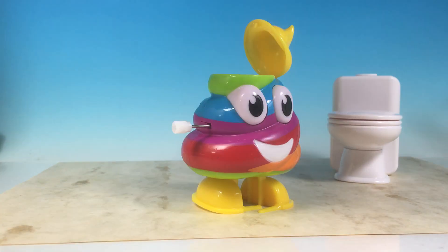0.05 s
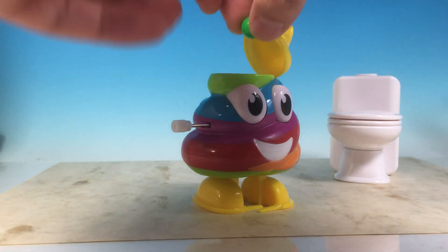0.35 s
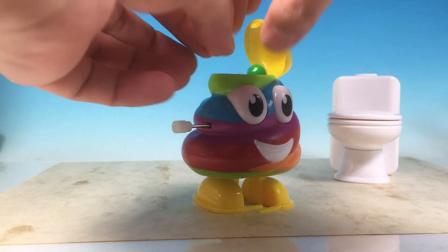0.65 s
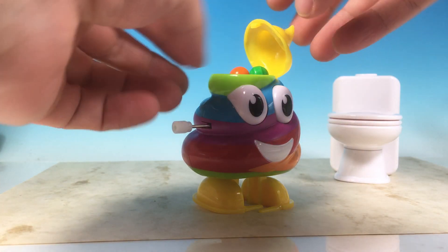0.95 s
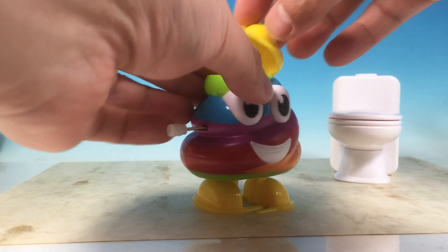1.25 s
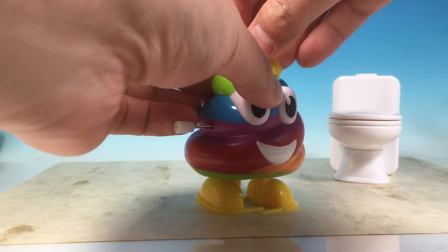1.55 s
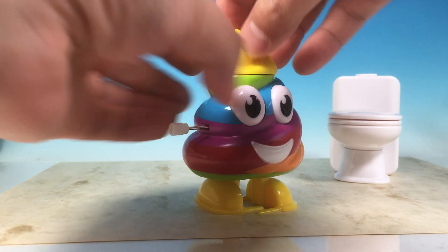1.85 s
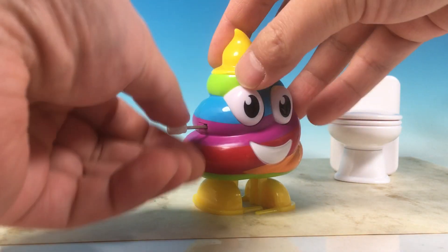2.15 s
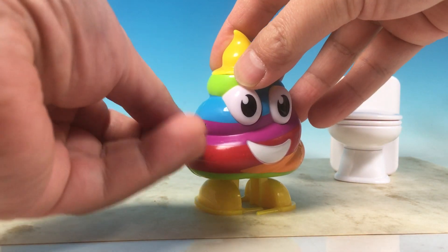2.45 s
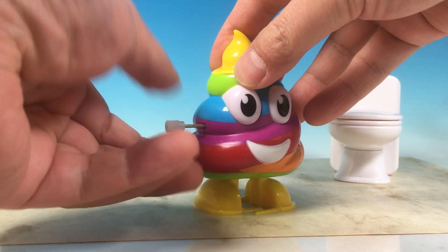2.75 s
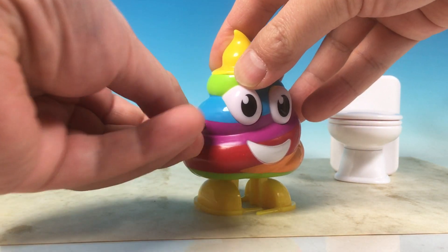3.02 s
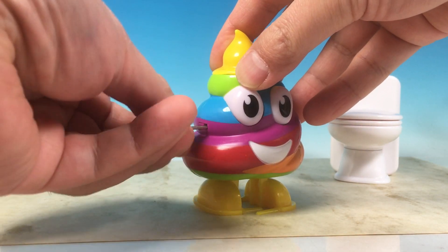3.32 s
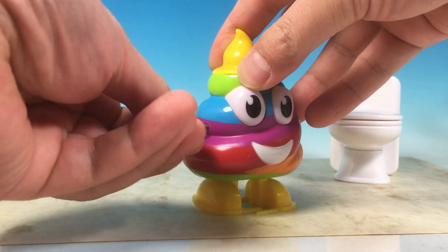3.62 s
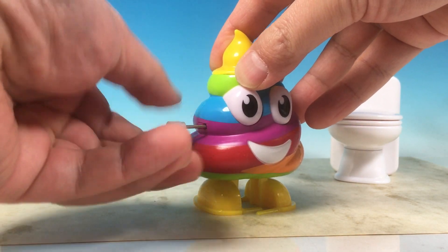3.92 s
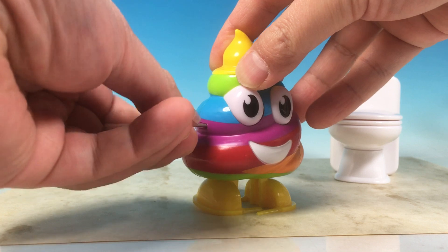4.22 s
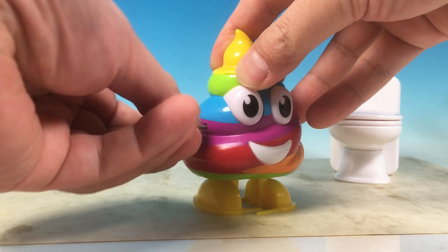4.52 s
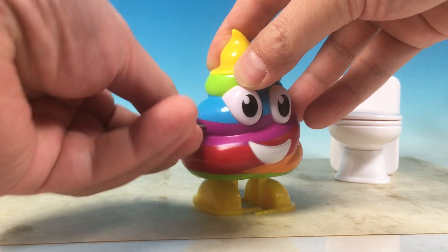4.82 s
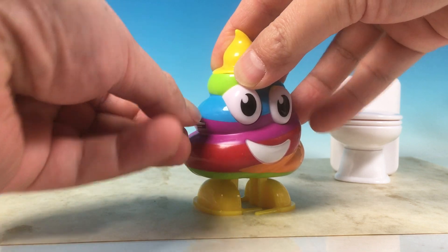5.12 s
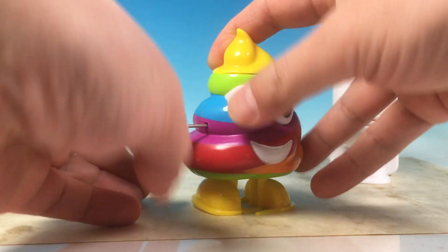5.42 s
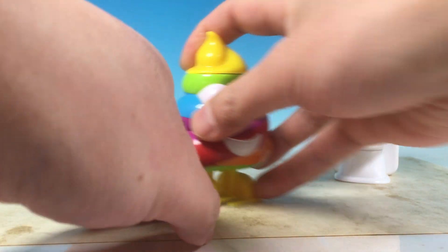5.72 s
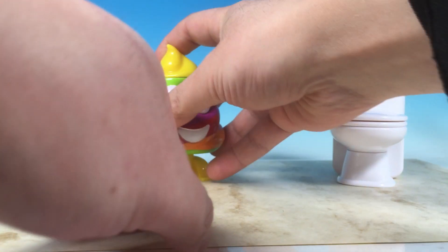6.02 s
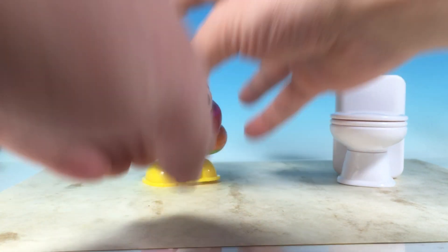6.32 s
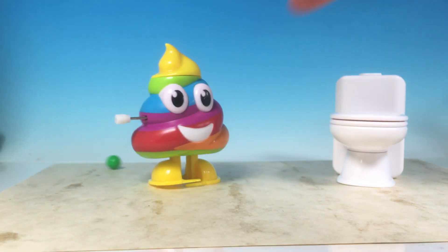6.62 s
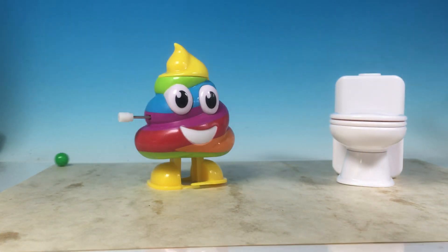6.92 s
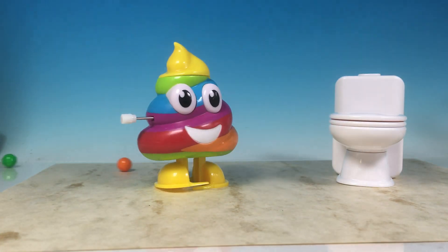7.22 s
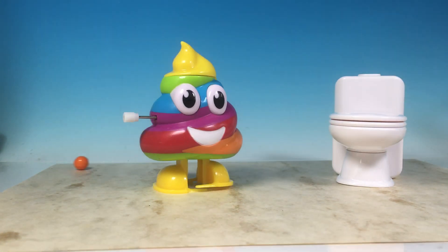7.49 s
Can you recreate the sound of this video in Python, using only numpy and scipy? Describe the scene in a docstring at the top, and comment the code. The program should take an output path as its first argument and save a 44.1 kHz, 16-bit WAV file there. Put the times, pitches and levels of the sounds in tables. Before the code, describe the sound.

Hard candies clatter into a hollow plastic toy and its lid snaps shut, with faint finger taps and rubs on the shell. A key is wound in seven quick twists, each a short run of ratcheting clicks. Then the clockwork starts a wavering whir and the toy walks over a table on clacking plastic feet, its loose shell chattering. The microphone is close, in a small, quiet room.

```python
"""A table in a small, quiet room, one microphone close to a hollow plastic wind-up toy.
Fingers tap and rub the shell, hard candies clatter into it and the lid snaps shut.
The key is wound in seven twists, the pawl clicking over the ratchet. Then the gear teeth whir
and the toy walks on stamping feet, its loose shell chattering, and turns twice before the microphone."""
import sys
import numpy as np
from scipy import signal
from scipy.fft import rfft, irfft
from scipy.io import wavfile
from scipy.ndimage import uniform_filter1d

SR = 44100
rng = np.random.default_rng(int(sys.argv[2]) if len(sys.argv) > 2 else 0)


def master(y):
    """Save y as 16-bit WAV."""
    cut = np.clip(np.atleast_2d(y).T, -1, 1)
    pcm = np.round(cut * 32767)  # scale
    wavfile.write(sys.argv[1], SR, pcm.astype(np.int16))


N = 341775
TIME = np.arange(N) / SR
RING = TIME[:SR // 8]  # time axis of one blow [s]


def undb(db):
    """Decibels to gain."""
    return 10 ** (np.asarray(db) / 20)


def unit(x):
    """Scale to rms 1."""
    return x / np.sqrt(np.mean(x ** 2))


def curve(rows):
    """Join (time, value) rows by straight lines."""
    return np.interp(TIME, *np.transpose(rows))


def fade(t60):
    """Exponential ring-down, 60 dB in t60 seconds."""
    return np.exp(-np.log(1000) * RING / t60)


def add(track, s, sound):
    """Mix a sound in at s seconds."""
    start = max(int(s * SR), 0)
    track[start:start + len(sound)] += sound[:N - start]


def wander(rate):
    """Glide to a new random value rate times a second; rms 1."""
    hold = int(SR / rate)
    steps = np.repeat(rng.standard_normal(N // hold + 1), hold)
    return unit(uniform_filter1d(steps, hold)[:N])


def tint(x, colour, bass_db=0, treble_db=0, modes=(), size=4096):
    """Minimum-phase filter: a (Hz, dB) colour, bass and treble shelves, (Hz, width, dB) resonances."""
    hz = np.maximum(np.fft.rfftfreq(size, 1 / SR), 1)
    points, db = np.transpose(colour)
    colour_db = np.interp(np.log(hz), np.log(points), db)
    shelves = bass_db / (1 + (hz / 2400) ** 6) + treble_db / (1 + (7000 / hz) ** 6)
    peaks = 1 + sum(undb(d) ** 2 / (1 + (2 * (hz - f) / w) ** 2) for f, w, d in modes)
    cepstrum = irfft(np.log(undb(colour_db + shelves) * np.sqrt(peaks)))
    cepstrum[1:size // 2] *= 2
    cepstrum[size // 2 + 1:] = 0
    return signal.fftconvolve(x, irfft(np.exp(rfft(cepstrum))))[:len(x)]


def patchy(colour, spread_db):
    """Every point of contact favours other modes: random hills and dips on a colour."""
    hz = np.geomspace(150, 16000, 40)
    points, db = np.transpose(colour)
    colour_db = np.interp(np.log(hz), np.log(points), db)
    return np.transpose([hz, colour_db + spread_db * rng.standard_normal(len(hz))])


def friction(grain_rate, scatter_db, ring_t60):
    """Stick-slip bursts of uneven size, each dying away quickly."""
    slips = (rng.random(N) < grain_rate / SR) * undb(scatter_db * rng.standard_normal(N)) ** 2
    power = signal.fftconvolve(slips, fade(ring_t60) ** 2)[:N]
    return unit(np.sqrt(np.abs(power)) * rng.standard_normal(N))


def swells(rows):
    """Envelope of rubs, each starting more quickly than it dies away."""
    return sum(undb(db) * np.exp(-((TIME - s) / (half * np.where(TIME < s, .75, 1.3))) ** 2)
               for s, half, db in rows)


# the room's air at the microphone: (frequency [Hz], level [dB])
AIR_COLOUR = [(15, -34.5), (25, -7.5), (82, 4), (161, -9), (309, -11.5), (451, -18.5), (531, -15),
              (863, -21), (988, -17), (1330, -23), (1790, -20.5), (2050, -24), (16000, -38)]


def room_tone():
    """Low rumble, soft hiss and a faint hum behind the toy."""
    air = unit(tint(rng.standard_normal(N), AIR_COLOUR)) * undb(-56.5 + 1.2 * wander(8.4))
    hum = undb(-77) * unit(np.sin(2 * np.pi * 520 * TIME))
    return air + hum


# the hollow shell's clearest modes, rung by every blow: (frequency [Hz], level [dB], t60 [s])
SHELL_RINGS = [(1367, -18, 0.09), (1784, -2.5, 0.05), (2051, 5, 0.036), (2550, 3.5, 0.04), (3260, 1, 0.055),
               (4245, 7, 0.042), (4700, -4, 0.06), (6330, 0, 0.06), (7220, 0.5, 0.043), (8000, 4, 0.05),
               (9090, 7, 0.038), (12900, 6.5, .04), (13160, 5, 0.04), (13900, 10, .035)]


def knocks(rows, colour, crack_t60, ring_t60, ring_db, modes_db, gain_db, patchy_db):
    """Each blow cracks, then rings a wash of dense modes and the shell's clear ones in a new mix."""
    out = np.zeros(N)
    envelope = fade(crack_t60) + undb(ring_db) * fade(ring_t60)
    rings = np.array([undb(db + modes_db) * np.exp(2j * np.pi * hz * RING) * fade(t60)
                      for hz, db, t60 in SHELL_RINGS])
    for s, db, bass_db, treble_db in rows:
        shares = rng.standard_normal(len(rings)) + 1j * rng.standard_normal(len(rings))
        struck = rng.standard_normal(len(RING)) * envelope + np.imag(shares @ rings)
        struck[0] += undb(7.5)  # the first instant of contact
        blow = tint(struck, patchy(colour, patchy_db), bass_db, treble_db)
        attack = blow[RING < .006]
        add(out, s, blow * undb(db + gain_db) / np.std(attack))
    return out


# skin on plastic, close up: (frequency [Hz], level [dB])
FINGER_COLOUR = [(150, 3.5), (400, -4), (600, 1.5), (850, -4.5), (1400, 2.5), (3000, -3), (4200, -5),
                 (6000, -4.5), (9000, -9), (13000, -12), (16000, -27)]
# fingers landing on shell and key: (time [s], level [dB], bass [dB], treble [dB])
FINGER_TAPS = [(0.0394, -44.5, 7.5, 5), (0.0733, -38, -22, 27), (0.125, -42, 19.5, 28),
               (0.4917, -46, 1, -40), (0.5052, -48, -2, -48), (1.2205, -43.5, 3, 18),
               (1.2357, -45, -11, -48), (1.2511, -53, -9, -11), (2.1175, -49, 10, 5),
               (2.2131, -44, -38, -8), (2.403, -48, 6, 15), (2.7988, -48, -3, -33), (2.958, -51, -6, -20),
               (3.2504, -52, -14, -21), (3.7031, -49.5, -7, -16), (3.9189, -51, -14, 8),
               (4.0789, -50, 9, 9), (4.8182, -49.5, 0, -13), (5.2648, -53.5, -10, -21),
               (5.3097, -52, -1, 2), (5.615, -39, 3, 13), (5.6668, -45, 2, -32)]
# faint ticks and creaks of the plastic shell during winding and walking
CREAKS_START_S, CREAKS_END_S = 2.6, 7.6


def taps_and_ticks():
    """Fingertips knock the shell; during winding and walking it ticks faintly at random moments."""
    ticks = [(CREAKS_START_S + when * (CREAKS_END_S - CREAKS_START_S), -58 - 6 * weak, 0, -22)
             for when, weak in rng.random((14, 2))]
    return knocks(FINGER_TAPS + ticks, FINGER_COLOUR, crack_t60=.013, ring_t60=.047,
                  ring_db=4, modes_db=-26, gain_db=2.5, patchy_db=3)


# fingers sliding over the plastic: (peak time [s], half length [s], level [dB])
FINGER_SLIDES = [(.085, 0.052, -47), (.49, .015, -58), (1.225, 0.089, -58), (1.43, 0.065, -55),
                 (1.521, 0.0068, -43), (1.95, 0.14, -62.5), (2.185, 0.044, -48), (2.27, 0.12, -55),
                 (2.56, 0.019, -54), (2.78, 0.033, -57), (2.915, 0.016, -48), (3.27, 0.013, -48),
                 (5.39, 0.027, -52.5), (5.58, 0.29, -51.5)]


def rubs_and_creaks():
    """Two fingertips catch and slip on the shell; during winding and walking it creaks faintly."""
    colours = [patchy(FINGER_COLOUR, 3) for _ in range(2)]
    slips = [tint(friction(grain_rate=230, scatter_db=1.5, ring_t60=.022), colour) for colour in colours]
    rub = unit(sum(slip * undb(2.8 * wander(35)) for slip in slips))
    creaking = undb(-67) * (TIME > CREAKS_START_S) * (TIME < CREAKS_END_S)
    return (swells(FINGER_SLIDES) + creaking) * rub


# soft bumps passed to the table under the toy: (time [s], level [dB], pitch [Hz])
TABLE_BUMPS = [(0.109, -44, 409), (0.139, -39, 53.3), (0.425, -42.5, 70), (0.49, -40, 43.4),
               (0.661, -43.5, 105), (1.229, -40, 95), (1.456, -31.5, 92.5), (1.526, -35, 82),
               (1.53, -40.5, 174), (1.851, -44.5, 79), (2.181, -44, 120.4), (4.815, -48, 368),
               (4.818, -42.5, 106), (5.316, -36, 82), (5.525, -45, 95), (6.06, -47, 108), (6.745, -39, 93),
               (7.348, -43.5, 101.8), (7.627, -37, 100)]


def table_thuds(rows):
    """The tabletop answers each push with two low, quickly damped modes."""
    out = np.zeros(N)
    envelope = 2 * (fade(.11) - fade(.017))
    for s, db, hz in rows:
        sway = np.sin(2 * np.pi * hz * RING) + undb(-10.5) * np.sin(2 * np.pi * 1.8 * hz * RING)
        add(out, s, undb(db) * sway * envelope)
    return out


# candy on the inside of the shell: (frequency [Hz], level [dB])
CLATTER_COLOUR = [(180, -44), (400, -28.5), (900, -25.5), (1400, -7), (1700, -8.5), (2100, -3), (2500, -7),
                  (3000, -5), (3900, -2.5), (4500, -3), (5400, -8), (9000, -9), (10200, -14), (12000, -11),
                  (16000, -27.5)]
# candies landing: (time [s], level [dB], bass [dB], treble [dB])
CANDY_HITS = [(0.661, -15.5, 2, 2.5), (0.6775, -28.5, 14, 2.5), (0.7033, -41, 10, 11), (0.725, -46, 17, -3),
              (0.73, -22.5, 11.5, 4), (0.7514, -36.5, 14, 4), (0.7663, -38.5, 18, -5),
              (0.7987, -45, 9, -11), (0.8392, -40, 17, 13), (0.8547, -24.5, 5, 3), (0.8813, -18, 0.5, 4),
              (0.8959, -22, 1, -4), (0.9218, -27, -2, -6.5), (0.951, -34.5, 2.5, -8)]


def candies():
    """Hard candies drop into the hollow body, each with one quick, duller rebound."""
    rebounds = [(s + .007, db - 12, bass, treble - 14) for s, db, bass, treble in CANDY_HITS]
    return knocks(CANDY_HITS + rebounds, CLATTER_COLOUR, crack_t60=.0064, ring_t60=.055,
                  ring_db=-5, modes_db=-23, gain_db=-1.5, patchy_db=3)


# the lid's snap, close up: (frequency [Hz], level [dB])
SNAP_COLOUR = [(180, -50), (330, -49), (620, -30.5), (780, -26), (950, -7.5), (1170, -1.5), (1500, -8),
               (2000, -9.5), (2520, -6), (3200, -10), (4800, -13.5), (7700, -15.5), (13100, -21.5),
               (16000, -33)]
# the lid striking its catch: (time [s], level [dB], bass [dB], treble [dB])
LID_HITS = [(1.4533, -30, 4.5, 2.5), (1.4706, -42, -3, -9), (1.526, -15.5, 6, -0.5)]


def lid():
    """The lid meets its catch, then snaps over it."""
    return knocks(LID_HITS, SNAP_COLOUR, crack_t60=.014, ring_t60=.063,
                  ring_db=-16, modes_db=-27, gain_db=-1, patchy_db=0)


# key and pawl, close up: (frequency [Hz], level [dB])
WINDER_COLOUR = [(240, -33), (400, -29), (750, -27), (1150, -11.5), (1500, -13.5), (2100, -4.5),
                 (2500, -7.5), (3200, -7), (4300, -7.5), (5500, -7), (7700, -3), (10600, -9), (13100, -3.5),
                 (16000, -2.5)]
# scrapes of the key: (peak time [s], half length [s], level [dB])
KEY_SCRAPES = [(2.495, 0.0063, -44), (2.918, 0.0046, -43), (3.273, 0.0056, -32.5), (3.342, 0.0081, -44.5),
               (3.665, 0.0078, -31.5), (4.495, 0.0093, -36), (4.727, 0.0041, -46), (4.875, 0.011, -27.5),
               (4.959, 0.02, -42), (5.397, 0.018, -41.5)]


def key_scrapes():
    """The key scrapes in its bearing as the fingers take a new grip."""
    slips = friction(grain_rate=2200, scatter_db=4, ring_t60=.0097)
    scrape = unit(tint(slips, WINDER_COLOUR, bass_db=3.5, treble_db=3.5))
    return undb(1.5) * swells(KEY_SCRAPES) * scrape


def twist(start, end, clicks, slow_start, slow_end, db, first_bass_db, last_bass_db, treble_db):
    """One twist's clicks as rows for knocks: the wrist speeds up, turns evenly and slows."""
    starting = np.exp(-np.arange(round(clicks)) / 1.25)  # the first teeth are softer and duller
    gaps = 1 + slow_start * starting[:-1] + slow_end * starting[:-1][::-1]
    progress = np.append(0, np.cumsum(gaps)) / gaps.sum()
    grip_bass_db = first_bass_db + (last_bass_db - first_bass_db) * progress  # the grip damps the shell
    level_scatter, bass_scatter, treble_scatter = rng.standard_normal((len(progress), 3)).T
    return np.transpose([start + (end - start) * progress,
                         db - 2 * starting - .83 * level_scatter,
                         grip_bass_db + 2 * bass_scatter,
                         treble_db - 5 * starting + 2 * treble_scatter])


# twists of the key: (first click [s], last click [s], clicks [count], slow start [extra gaps],
# slow end [extra gaps], level [dB], first bass [dB], last bass [dB], treble [dB])
KEY_TWISTS = [(2.58, 2.707, 15, 1.6, 0, -25, 8, 0, 1), (2.9835, 3.0783, 12, .95, 3, -24, -2, 3, -1),
              (3.3728, 3.478, 10, 1.25, 2.95, -24, 0, 3, 0), (3.7525, 3.883, 10, -.2, .2, -23.5, -1, -7, 1),
              (4.172, 4.2693, 10, .08, .45, -22, -2, 1, -1), (4.5786, 4.6459, 8, .8, 1.55, -24, -1, 4, 0),
              (4.9968, 5.1146, 5, -.05, 2.1, -22.5, 1, -7, 6)]
# the pawl settling back after the second twist: (time [s], level [dB], bass [dB], treble [dB])
PAWL_SETTLE = [(3.1056, -31.5, 4, -21)]


def pawl():
    """The pawl snaps over the ratchet teeth, coloured anew by each grip."""
    grips = [twist(*row) for row in KEY_TWISTS] + [PAWL_SETTLE]
    return sum(knocks(clicks, patchy(WINDER_COLOUR, .77), crack_t60=.012, ring_t60=.058,
                      ring_db=-9, modes_db=-27, gain_db=-.5, patchy_db=2) for clicks in grips)


STRIDE_S, STRIDE_START_S = .617, 6.47  # one turn of the leg crank; a moment when the heavier leg lifts


def each_stride(s, half):
    """A smooth hump that returns s seconds into every stride."""
    away = (TIME - STRIDE_START_S - s + STRIDE_S / 2) % STRIDE_S - STRIDE_S / 2
    return np.exp(-(away / half) ** 2)


def gear_teeth(phase, jitter, scatter_db, alternate):
    """One click for each tooth, slightly early or late, every second one weaker."""
    teeth = np.arange(np.count_nonzero(np.diff(np.floor(phase))))
    timing, force = rng.standard_normal((len(teeth), 2)).T
    places = np.interp(teeth + 1 + jitter * timing, phase, np.arange(N))
    sizes = undb(scatter_db * force) * (1 + alternate * (-1) ** teeth)
    return np.bincount(np.round(places).astype(int), sizes, N)[:N]


def rattle(teeth, shift_db):
    """Tooth clicks reach the shell along four paths, whose shares shift as the loose axles rock."""
    out = 0
    for _ in range(4):
        path = rng.standard_normal(len(RING)) * (fade(.0037) + undb(-6) * fade(.054))
        out = out + signal.fftconvolve(teeth, path)[:N] * wander(40) * undb(shift_db * wander(9.8))
    # the spring feeds the same power whichever path it takes
    return out / np.sqrt(uniform_filter1d(out ** 2, size=400) + 1e-12)


# the gears heard through the shell: (frequency [Hz], level [dB])
WHIR_COLOUR = [(60, -16), (160, -10), (250, -24), (400, -15), (700, -15), (1100, -6.5), (1450, -7),
               (2000, 2.5), (2500, -5), (3400, -3), (4800, -3.5), (7300, -1.5), (9500, 1), (12000, -2),
               (14500, 1.5), (15400, -11), (16000, -20)]
# resonances facing the microphone as the toy is held, sets off and has turned:
# (frequency [Hz], width [Hz], relative level [dB])
HELD_SIDE = [(1640, 400, -9), (5400, 580, -3), (9000, 120, -2), (9600, 290, -4.5), (12200, 540, -6),
             (13800, 790, -12)]
WALKING_SIDE = [(3400, 200, -3), (4780, 219, 2), (6000, 250, 1), (8960, 170, 7), (10000, 260, -1),
                (11200, 340, 6), (12500, 400, 3)]
TURNED_SIDE = [(4580, 640, 1.85), (5720, 250, 2.4), (6330, 78, 3), (9160, 72, 3.3), (9830, 300, 4.1),
               (10870, 170, 4.1), (12270, 250, 6.1)]
# start and end of each of the two turns: (time [s])
TURN_TIMES = [6.4, 6.56, 7.0, 7.2]


def gear_whir(phase):
    """Gear teeth rattle the shell; as the toy turns, other sides of it face the microphone."""
    gears = rattle(gear_teeth(phase, jitter=.19, scatter_db=1.5, alternate=.11), shift_db=4)
    whir = 0
    for side, shares in [(HELD_SIDE, [1, .21, .25, .11]),
                         (WALKING_SIDE, [.18, .82, .88, .16]),
                         (TURNED_SIDE, [.076, .39, .15, 1])]:
        modes = [(hz, width, db + 7.5) for hz, width, db in side]
        facing = np.interp(TIME, TURN_TIMES, shares)
        whir = whir + facing * unit(tint(gears, WHIR_COLOUR, modes=modes))
    return undb(1) * whir


def gear_whine(phase, tooth_hz):
    """The meshing tone and the octave below flicker, and swell through two resonances of the body."""
    body = 1 / (1 + ((tooth_hz - 2020) / 210) ** 2) + .61 / (1 + ((tooth_hz - 1550) / 90) ** 2)
    meshing = undb(-12.5) * body * unit((1 + .7 * wander(70)) * np.sin(2 * np.pi * phase))
    octave_below = undb(-29 + 5 * wander(50)) * np.sqrt(body) * np.sin(np.pi * phase)
    return meshing + octave_below


# gear speed without the legs' load, braked by the hand until let go: (time [s], tooth rate [Hz])
GEAR_SPEED = [(5.72, 1359), (5.8, 1654), (5.87, 1690), (5.95, 1923), (6.01, 1674), (6.12, 1482),
              (6.2, 1640), (6.24, 2077), (6.45, 2035), (6.7, 2168), (7, 2047), (7.3, 2125), (7.75, 2023)]
# force on the gears: (time [s], level [dB])
GEAR_FORCE = [(5.7, -78), (5.72, -45.5), (5.79, -30.5), (5.94, -33.5), (5.97, -27), (6.03, -36.5),
              (6.14, -43.5), (6.22, -27.5), (6.27, -31), (6.33, -28), (6.5, -31), (6.52, -39), (6.54, -28),
              (7.75, -27.5)]
# loads on the gears, two for each leg: (time into stride [s], half length [s], speed lost [share])
STRIDE_LOADS = [(-.005, .035, .14), (.115, .025, .07), (.31, .03, .1), (0.419, .025, .08)]


def clockwork():
    """The spring drives the gears, whose pitch and level sag under each leg."""
    sag = sum(share * each_stride(s, half) for s, half, share in STRIDE_LOADS)
    tooth_hz = curve(GEAR_SPEED) * (1 - sag)
    phase = np.cumsum(tooth_hz * (1 + .02 * wander(150))) / SR  # teeth passed
    running = TIME > GEAR_FORCE[0][0]
    drive = undb(curve(GEAR_FORCE) - 14 * sag + 1.15 * wander(45)) * running
    return drive * (gear_whir(phase) + gear_whine(phase, tooth_hz))


# plastic feet on the table, close up: (frequency [Hz], level [dB])
FOOT_COLOUR = [(150, -6), (400, -14), (650, -5), (1200, 4), (1500, 2), (2000, 3.5), (4000, 3), (7000, -2),
               (10000, -2.5), (16000, -12)]
# feet landing: (time [s], level [dB], bass [dB], treble [dB])
FOOTFALLS = [(5.9654, -21.5, -12, 2.5), (6.379, -26, -1, 7), (6.5296, -18.5, 2.5, -3),
             (6.5405, -17.5, -6, 6), (6.5905, -16.5, -11.5, 7), (6.605, -28.5, 12, -2),
             (6.9989, -20, -13.5, 0), (7.027, -20, -3, 4), (7.1447, -16.5, -1.5, -9), (7.1885, -17, -12, 7),
             (7.2061, -21.5, 2, 7), (7.5558, -19, -19, 3), (7.6095, -20.5, -8.5, -2)]


def feet():
    """Each stamp rings the shell and draws a faint thud from the table."""
    stamps = knocks(FOOTFALLS, FOOT_COLOUR, crack_t60=.014, ring_t60=.086,
                    ring_db=1, modes_db=-30, gain_db=-4.5, patchy_db=2)
    return stamps + table_thuds([(s, db - 28, 101.2) for s, db, _, _ in FOOTFALLS])


# the loose shell, close up: (frequency [Hz], level [dB])
LOOSE_SHELL_COLOUR = [(600, -28.5), (1500, -14), (2700, -7.5), (3400, 4), (4000, -11), (5000, -8),
                      (8000, -31), (16000, -23)]
# bursts of chatter: (time into stride [s], half length [s], level [dB])
CHATTER_BURSTS = [(.27, 0.12, -36), (0.551, 0.029, -32)]
FREE_S = 6.3  # the toy walks by itself from here


def shell_chatter():
    """The loose shell chatters as the weight shifts in every free stride."""
    lean = sum(undb(db) * each_stride(s, half) for s, half, db in CHATTER_BURSTS) * (TIME > FREE_S)
    grains = friction(grain_rate=1100, scatter_db=1.5, ring_t60=.018)
    return lean * unit(tint(grains, LOOSE_SHELL_COLOUR))


def wall_echo(toy):
    """The small room's walls return a weak, short echo, starting 6 ms behind the direct sound."""
    tail = rng.standard_normal(len(RING)) * fade(.18) * (RING > .006)
    tail = tint(tail, [(200, 1), (2500, -3.5), (16000, -2)])
    return undb(-28) * signal.fftconvolve(toy, tail / np.linalg.norm(tail))[:N]


def scene():
    """The toy close up with the room behind it; one microphone feeds both channels."""
    contacts = taps_and_ticks() + rubs_and_creaks() + table_thuds(TABLE_BUMPS)
    toy = contacts + candies() + lid() + key_scrapes() + pawl() + clockwork() + feet() + shell_chatter()
    mono = room_tone() + toy + wall_echo(toy)
    return np.array([mono, mono])


def record(dry):
    """The recorder cuts the rumble below 33 Hz and the top above 15.9 kHz."""
    low_cut = signal.butter(4, 33, "high", fs=SR, output="sos")
    top_cut = signal.ellip(10, .2, 80, 15900, fs=SR, output="sos")
    return signal.sosfilt(top_cut, signal.sosfilt(low_cut, dry))


dry = scene()
out = record(dry)
master(out)
```